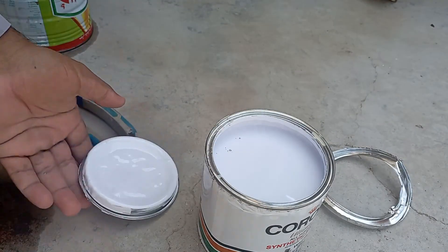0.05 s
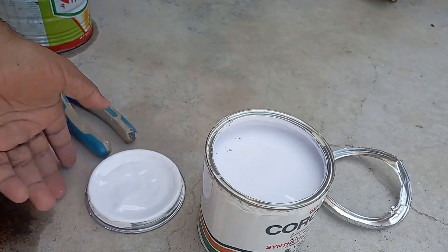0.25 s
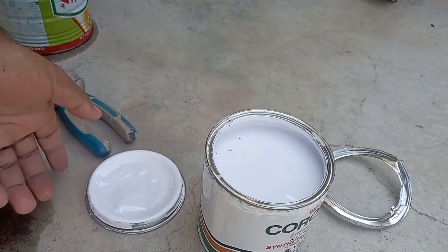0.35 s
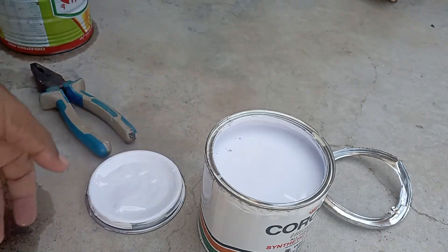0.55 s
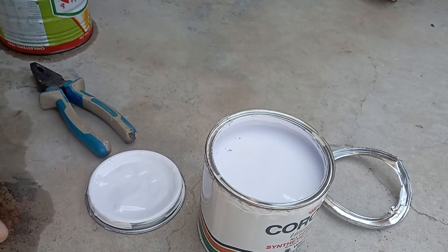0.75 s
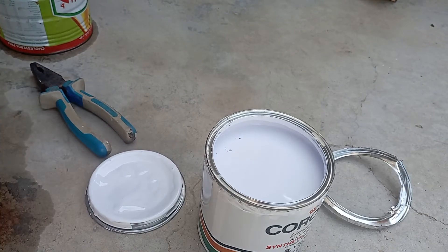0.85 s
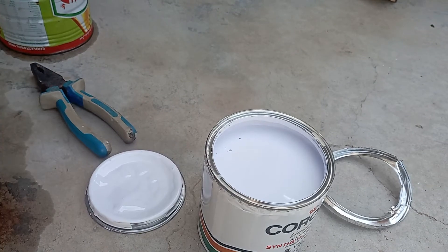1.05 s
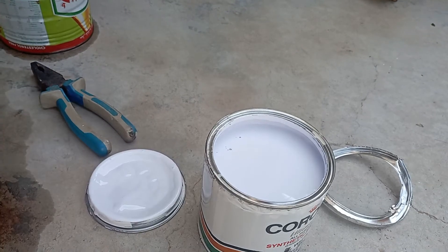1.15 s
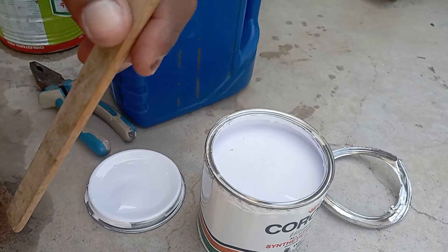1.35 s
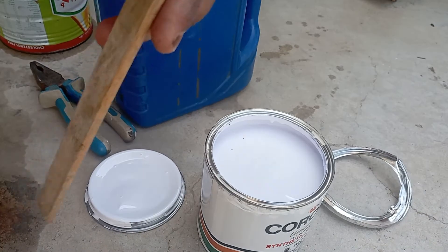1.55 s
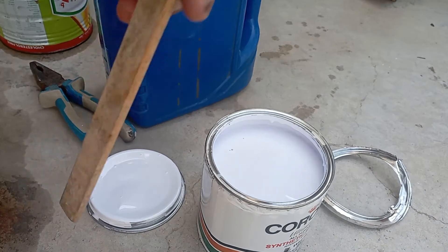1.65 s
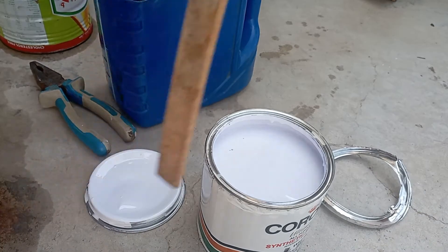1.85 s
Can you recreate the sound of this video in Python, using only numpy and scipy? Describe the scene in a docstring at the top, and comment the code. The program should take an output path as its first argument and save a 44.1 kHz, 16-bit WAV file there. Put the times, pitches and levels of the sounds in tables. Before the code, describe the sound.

A tin paint lid clatters onto concrete, followed by microphone wind thumps and faint birds.

```python
"""In a workshop, a tin paint lid slides off the fingers with small rim ticks, drops on the concrete
floor, rattles and lies flat. Each hit makes the thin metal ring. Wind then thumps on the two
openings of a close microphone. The scene jumps to a calmer moment: small birds chirp some way off,
echoing from the walls, while a lower whistle dies away over a low hum."""
import sys
import numpy as np
from scipy import signal
from scipy.fft import rfft, irfft
from scipy.io import wavfile

SR = 44100
rng = np.random.default_rng(int(sys.argv[2]) if len(sys.argv) > 2 else 0)


def waveform_to_disk(signal):
    """Save audio, clipped to [-1, 1], as 16-bit WAV at the path in sys.argv[1]."""
    frames = np.transpose(np.atleast_2d(signal))
    scaled = np.clip(frames, -1, 1) * 32767
    samples = np.round(scaled).astype(np.int16)
    wavfile.write(sys.argv[1], SR, samples)


N = 83790
DROP_S, FLAT_S, JUMP_S = .285, .376, 1.323  # the lid leaves the fingers, lies flat; the scene jumps
RIGHT_LAG_S = .000178  # the lid's sound reaches the right opening this much later

# Hits of the rim and how hard each drives the low, middle and high pitches
# (time [s], low level [dB], middle level [dB], high level [dB])
RIM_HITS = [(.001, -41.5, -39.5, -35.5), (0.0314, -46, -48, -40.5), (0.067, -35.5, -38.5, -32.5),
            (.080, -44, -37.5, -33), (.150, -33.5, -34, -34.5), (0.159, -34.5, -33, -32.5),
            (.171, -33, -34, -36.5), (.2056, -28.5, -29.5, -28.5), (.222, -31, -36.5, -37),
            (.231, -33, -32, -33.5), (0.258, -35, -29.5, -31), (0.277, -34.5, -27.5, -30),
            (0.2918, -18.5, -34, -23.5), (0.2964, -14, -9, -12), (0.2984, -16, -5.5, -11.5),
            (0.3026, -26.5, -19, -15.5), (0.326, -21, -30, -29), (0.3369, -23, -33, -35.5),
            (.342, -23.5, -21, -20.5), (0.359, -31.5, -32.5, -30), (.372, -33, -38, -36.5)]
# How hard the rim drags on the concrete (time [s], level [dB])
RIM_SCRAPE = [(.04, -48.5), (.07, -48), (.11, -49), (.16, -47.5), (.37, -40)]


def paint_lid(scrape_ticks=44):
    """The rim ticks and scrapes on concrete, drops and rattles to rest; the workshop echoes faintly."""
    out = np.zeros((2, N))
    for at_s, *band_db in RIM_HITS:
        add(out, at_s, rim_hit(at_s, band_db))
    # A scrape is many tiny hits, unevenly spaced.
    for at_s in (np.arange(scrape_ticks) + rng.random(scrape_ticks)) * FLAT_S / scrape_ticks:
        db = np.interp(at_s, *np.array(RIM_SCRAPE).T)
        add(out, at_s, rim_hit(at_s, (db, db, db)))
    return out + undb(-26) * echo(out, t60=.34)


def rim_hit(at_s, band_db, size=8192, hard_db=-26):
    """One hit gives a crack, a short clatter and clear notes. Hard hits crack more and ring less."""
    age = np.arange(size) / SR
    ring_age = age + np.maximum(age - max(FLAT_S - at_s, 0), 0)  # lying flat, it fades twice as fast
    ring_gain = undb(-.36 * max(max(band_db) - hard_db, 0))
    low, middle, high = (undb(db) * pan(left_db) for db, left_db in zip(band_db, (1.5, 1.5, 3)))
    below = lambda f, hz: 1 / (1 + (f / hz) ** 10)
    band_gain = lambda f: high + (middle - high) * below(f, 6000) + (low - middle) * below(f, 1900)
    crack_fade = undb(1.5) * fade(age, t60=.022)
    clatter_fade = ring_gain * undb(-4.5) * fade(ring_age, t60=.097)
    clatter = shape(metal_clatter(size), band_gain) * (crack_fade + clatter_fade)
    notes = ring_gain * undb(-9) * metal_notes(age, ring_age, band_gain, held=at_s < DROP_S)
    rise_s = .00009 if max(band_db) > hard_db else .0006
    return (clatter + notes) * (1 - np.exp(-age / rise_s))


# Tone of the thin metal's many short vibrations (frequency [Hz], relative level [dB])
CLATTER_TONE = [(200, -10.5), (500, -6), (850, 4.5), (1300, 3), (2000, -6), (2350, 9), (2950, -11),
                (4200, -11.5), (4750, -9), (5800, -15), (7200, -3), (10300, 8), (13200, -15),
                (15500, -12.5)]


def metal_clatter(size):
    """Crowded vibrations of the sheet blur into noise, with a slightly different tone on every hit."""
    shared = rng.standard_normal(size)
    noise = np.array([shared, np.roll(shared, int(RIGHT_LAG_S * SR))])
    noise += rng.standard_normal((2, size))  # separate noise on each side widens the sound
    bump_hz = np.arange(0, SR / 2, 450)
    bump_db = 3 * rng.standard_normal(len(bump_hz))
    return unit(shape(colour(noise, CLATTER_TONE), lambda f: undb(np.interp(f, bump_hz, bump_db))))


# The lid's ringing notes (pitch [Hz], relative level when free [dB], relative level on the fingers [dB])
LID_NOTES = [(920, -7, -14), (947, 0, -3), (1167, -6, -12), (1260, -11, -10), (1355, -18, -5),
             (1582, -6, -3), (1790, -17, -9), (1930, -7, -11), (2255, 1, -12), (2317, 4, -5),
             (2525, 0, -11), (3138, -12, -24), (3260, -22, -15), (3515, -14, -26), (4070, -17, -20),
             (4745, -5, -14), (5295, -17, -15), (5560, -24, -18), (7190, -7, -10), (8366, -3, -10),
             (9100, -5, -2), (9504, 0, -3), (10197, -1, -2), (10686, -5, -10), (11175, -6, -14)]


def metal_notes(age, ring_age, band_gain, held):
    """The lid rings: each spot on the rim favours other notes, and the high notes die first."""
    arrival = age - np.array([[0], [RIGHT_LAG_S]])
    phases = rng.random(len(LID_NOTES))
    chances = rng.standard_normal((len(LID_NOTES), 2))
    out = np.zeros((2, len(age)))
    for (hz, free_db, held_db), phase, (pitch_luck, level_luck) in zip(LID_NOTES, phases, chances):
        db, detune = (held_db, .014) if held else (free_db, .003)
        wave = np.sin(2 * np.pi * (hz * (1 + detune * pitch_luck) * arrival + phase))
        ring_s = .18 * (1000 / hz) ** .16
        out += undb(db + 2 * level_luck) * band_gain(hz) * wave * fade(ring_age, ring_s)
    return out


# Air flowing over the microphone's openings (time [s], left level [dB], right level [dB])
WIND_FLOW = [(.40, -55, -71), (0.449, -38, -52), (0.508, -30.5, -30), (0.698, -33.5, -32.5),
             (0.791, -27.5, -25), (.86, -32.5, -35), (0.918, -40, -22.5), (1.06, -23.5, -25),
             (1.17, -32.5, -23), (1.32, -50.5, -23.5)]
# Single swirls of air that hit one opening
# (peak time [s], half length [s], level [dB], cutoff [Hz], side [0 left, 1 right])
WIND_SWIRLS = [(.460, .012, -23, 230, 0), (.486, 0.012, -21.5, 294, 0), (.527, 0.0032, -27.5, 340, 0),
               (0.58, 0.019, -21.5, 362, 0), (0.635, 0.011, -17.5, 269, 0), (0.667, 0.013, -17, 290, 0),
               (0.72, 0.012, -25, 407, 0), (0.883, 0.025, -22, 253.5, 0), (0.993, 0.028, -22.5, 340, 0),
               (1.118, 0.0096, -21, 389, 0), (1.156, 0.016, -20.5, 220, 0), (1.23, 0.031, -24.5, 215, 0),
               (0.539, 0.033, -21.5, 162, 1), (0.589, 0.017, -14.5, 184.7, 1), (.764, 0.012, -14.5, 292, 1),
               (0.816, 0.014, -24, 310, 1), (1.144, .008, -20.5, 416, 1), (1.174, 0.012, -21, 486, 1),
               (1.201, 0.017, -15.5, 217, 1), (1.223, 0.013, -16, 450, 1), (1.27, 0.038, -23, 290, 1)]


def wind(t, size=8192):
    """Flowing air rumbles and single swirls thump, differently at each of the two openings."""
    times, *sides = np.array(WIND_FLOW).T
    flow_db = [np.interp(t, times, db, left=-120) for db in sides]
    out = np.array([wind_rumble(N, cutoff_hz=250) * undb(db) for db in flow_db])
    from_peak = (np.arange(size) - size / 2) / SR
    for at_s, half_s, db, cutoff_hz, side in WIND_SWIRLS:
        swell = np.exp(-2 * (from_peak / half_s) ** 2)
        thump = wind_rumble(size, cutoff_hz) * swell
        thump *= np.sqrt(np.sum(swell ** 2) / np.sum(thump ** 2))  # chance does not set its strength
        add(out[int(side)], at_s + from_peak[0], undb(db) * thump)
    return out


def wind_rumble(n, cutoff_hz, lowest_hz=77.7):
    """Swirling air pushes on an opening: deep noise that drops steeply above the cutoff."""
    treble_cut = lambda f: (1 + (f / cutoff_hz) ** 7.68) * (1 + f / 250)
    bass_cut = lambda f: 1 + (lowest_hz / f) ** 9.4
    return unit(shape(rng.standard_normal(n), lambda f: 1 / np.sqrt(treble_cut(f) * bass_cut(f))))


# Bird chirps, each a slide in pitch
# (time [s], length [s], start pitch [Hz], end pitch [Hz], relative level [dB], rasp [share of pitch])
BIRD_CHIRPS = [(1.33, .06, 4900, 4600, -58, .045), (1.372, .018, 4350, 4340, -52.5, .02),
               (1.384, .055, 3850, 3650, -56, .05), (1.42, .1, 5900, 5200, -57.5, .075),
               (1.455, .07, 4400, 4200, -54, .06), (1.568, .08, 4750, 4450, -57.5, .06),
               (1.615, .045, 3850, 3520, -57, .035), (1.721, .022, 4200, 4900, -55, .035),
               (1.742, .018, 4250, 3750, -48.5, .015), (1.765, .018, 4450, 3950, -53, .05),
               (1.785, .021, 3550, 4400, -50, .012), (1.806, .02, 3850, 3470, -54, .015)]


def birds(t, wobble_hz=330):
    """A raspy twitter, then a clear warble, smeared by echoes from the walls around."""
    song = np.zeros(N)
    wobble = unit(shape(rng.standard_normal(N), lambda f: 1 / (1 + (f / wobble_hz) ** 4)))
    for at_s, length_s, start_hz, end_hz, db, rasp in BIRD_CHIRPS:
        progress = np.clip((t - at_s) / length_s, 0, 1)
        hz = (start_hz + (end_hz - start_hz) * progress) * (1 + rasp * wobble)  # fast wobble sounds raspy
        swell = np.sqrt(2 * np.abs(np.sin(np.pi * progress)))
        song += undb(db) * swell * np.sin(2 * np.pi * np.cumsum(hz) / SR)
    return undb(-2.5) * song + undb(-.3) * echo(song, t60=.48)


def whistle(t):
    """A breathy whistle, lower than the chirps, dies away after the jump."""
    return undb(-57.5) * pitched_noise(hz=2370, spread_hz=260) * fade(np.maximum(t - JUMP_S, 0), t60=.7)


def hum():
    """A low hum that wavers in level."""
    return undb(-46) * pitched_noise(hz=159.4, spread_hz=9.2)


# Tone of the background in the windy moment and in the calm one (frequency [Hz], relative level [dB])
WINDY_AIR = [(25, -30), (60, -9), (100, 0), (200, 0), (400, -9), (800, -26), (1500, -33), (3600, -37),
             (5000, -41), (10000, -39), (16000, -51)]
CALM_AIR = [(25, -33), (80, -1.5), (160, -1.5), (380, -4.5), (650, -19.5), (1200, -29.5), (2000, -26.5),
            (3000, -30), (6000, -31.5), (11000, -26), (16000, -46)]


def air(tone, db):
    """Steady distant rumble and hiss."""
    return undb(db) * colour(rng.standard_normal((2, N)), tone)


def echo(x, t60):
    """Many reflections blend into a fading tail, different on the left and right."""
    age = np.arange(SR // 2) / SR
    tail = rng.standard_normal((2, len(age))) * fade(age, t60) * (1 - np.exp(-age / .0022))
    tail /= np.sqrt(np.sum(tail[0] ** 2))
    return signal.fftconvolve(np.atleast_2d(x), tail, axes=1)[:, :N]


def undb(db):
    """Turn decibels into a number to multiply by."""
    return 10 ** (np.asarray(db) / 20)


def unit(x):
    """Scale a sound to an average strength (rms) of 1."""
    return x / np.sqrt(np.mean(x ** 2) + 1e-20)


def shape(x, gain):
    """Turn each frequency f up or down by gain(f)."""
    n = x.shape[-1]
    hz = np.maximum(np.arange(n // 2 + 1) * SR / n, 1)
    return irfft(rfft(x) * gain(hz), n)


def colour(x, tone):
    """Give noise a tone drawn through (frequency [Hz], relative level [dB]) points, at strength 1."""
    hz, db = np.array(tone, float).T
    return unit(shape(x, lambda f: undb(np.interp(np.log(f), np.log(hz), db))))


def pitched_noise(hz, spread_hz):
    """Stereo noise gathered around one pitch."""
    return unit(shape(rng.standard_normal((2, N)), lambda f: 1 / (1 + ((f - hz) / spread_hz) ** 2)))


def fade(age, t60):
    """Die away by 60 dB every t60 seconds."""
    return np.exp(-np.log(1000) * age / t60)


def pan(db):
    """Left and right gains that make the left louder by db."""
    return undb(np.array([[db], [-db]]) / 2)


def add(out, at_s, x):
    """Mix a sound in at a given time."""
    start = max(int(at_s * SR), 0)
    n = min(x.shape[-1], N - start)
    out[..., start:start + n] += x[..., :n]


def scene():
    """Lid and wind first; then, after a jump with a soft tick, birds, whistle and hum."""
    t = np.arange(N) / SR
    windy = paint_lid() + wind(t) + air(WINDY_AIR, db=-46)
    calm = whistle(t) + birds(t) + air(CALM_AIR, db=-46.5) + hum()
    tick_noise = colour(rng.standard_normal((2, N)), [(600, -7), (12000, -23)])
    tick = undb(-49) * tick_noise * np.exp(-np.abs(t - JUMP_S) / .0054)
    calm_share = np.clip((t - JUMP_S) / .003 + .5, 0, 1)
    return windy * (1 - calm_share) + calm * calm_share + tick


def record(dry):
    """The recorder rounds off the loudest peaks and cuts the deepest rumble and the highest hiss."""
    rumble_cut = signal.butter(2, 42, "high", fs=SR, output="sos")
    hiss_cut = signal.ellip(10, .2, 80, 15900, fs=SR, output="sos")
    return signal.sosfilt(hiss_cut, signal.sosfilt(rumble_cut, np.tanh(dry)))


dry = scene()
out = record(dry)
waveform_to_disk(out)
```